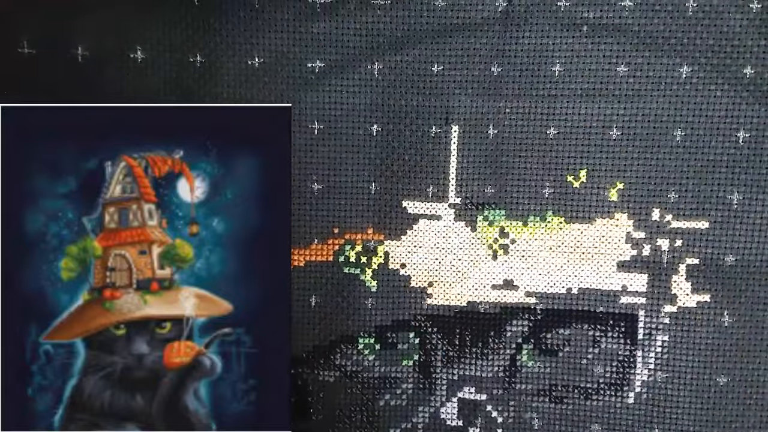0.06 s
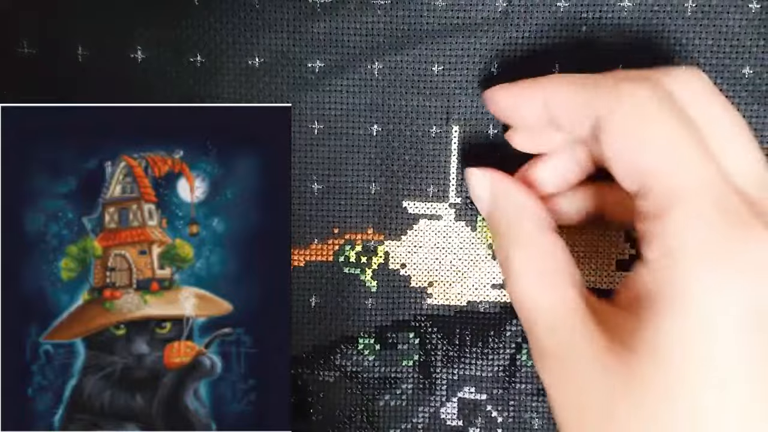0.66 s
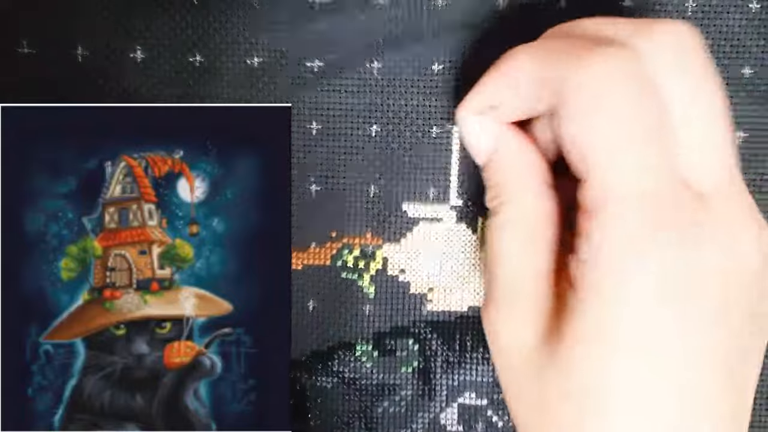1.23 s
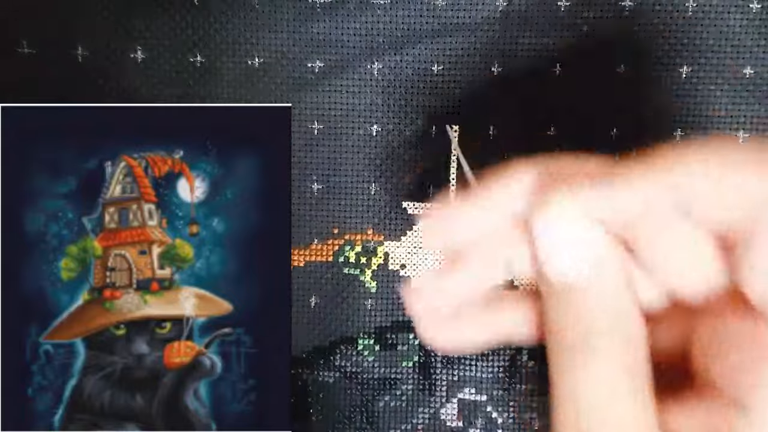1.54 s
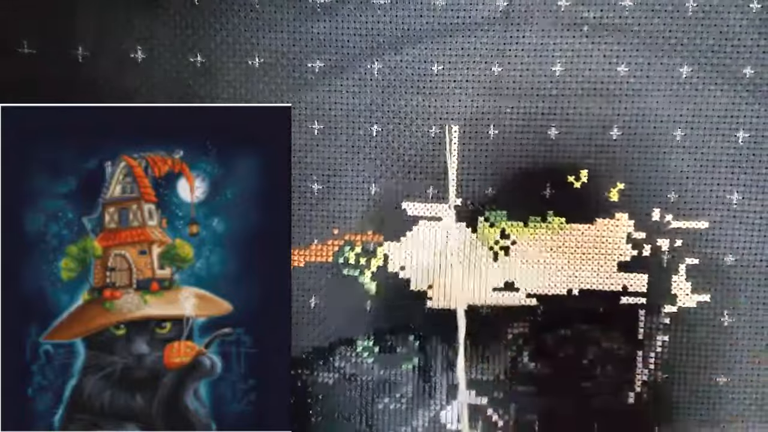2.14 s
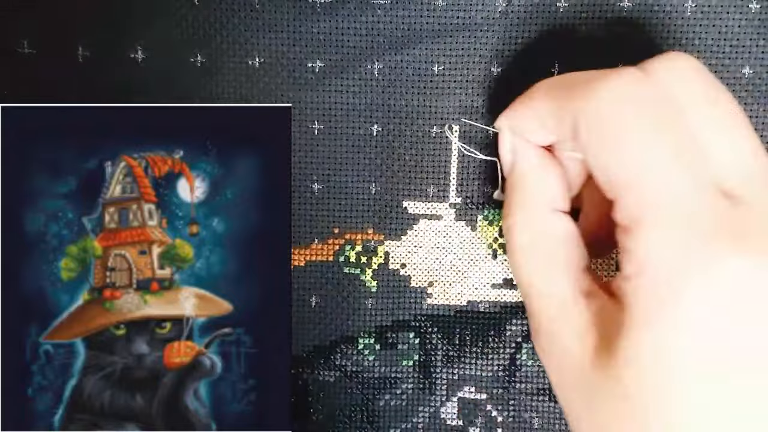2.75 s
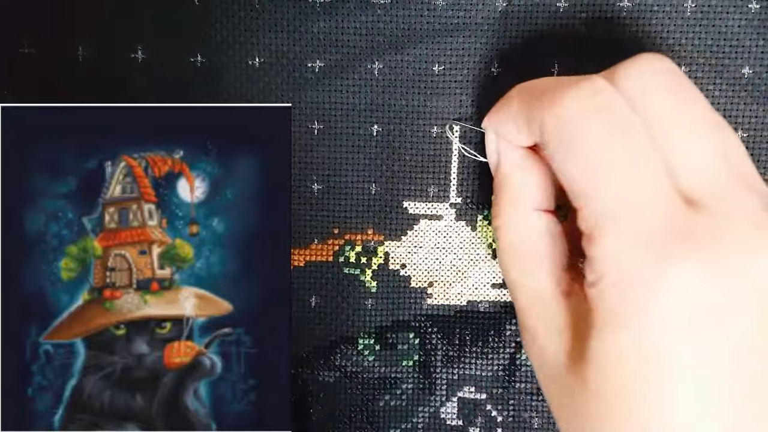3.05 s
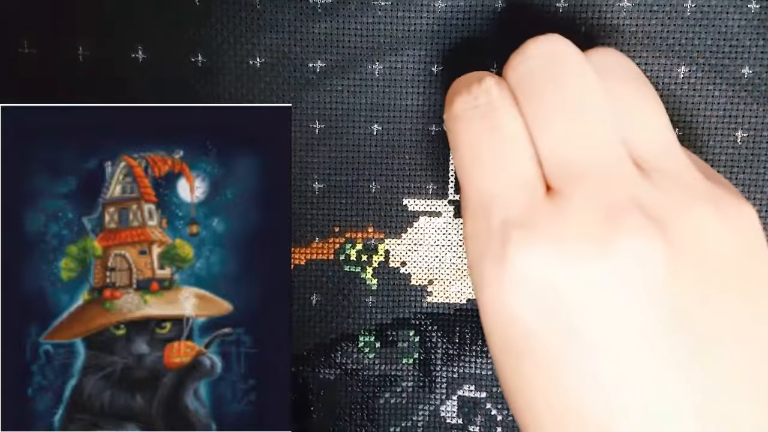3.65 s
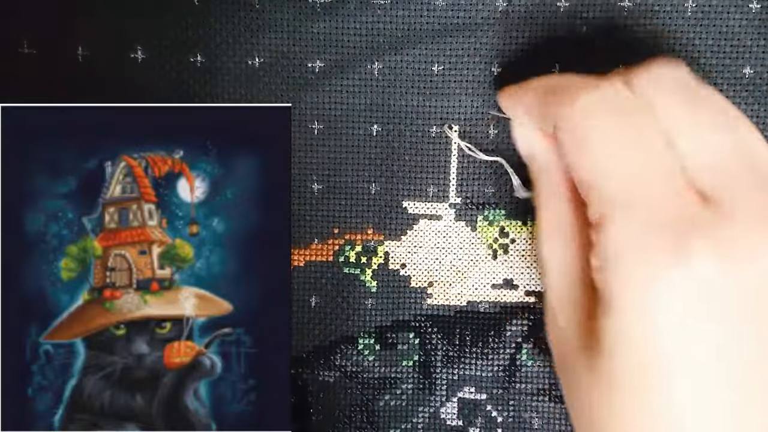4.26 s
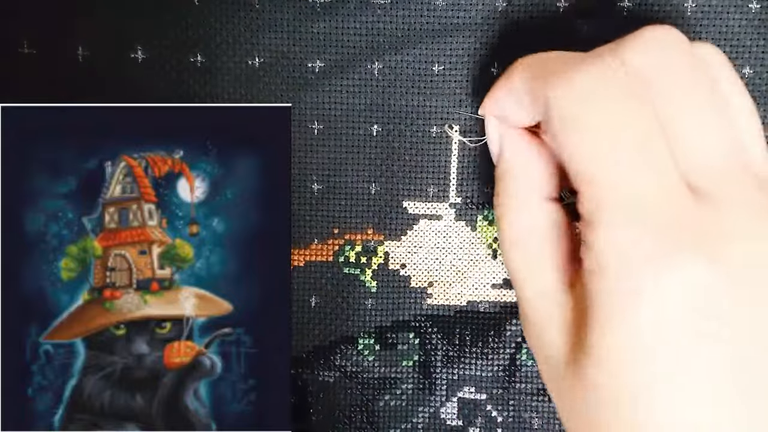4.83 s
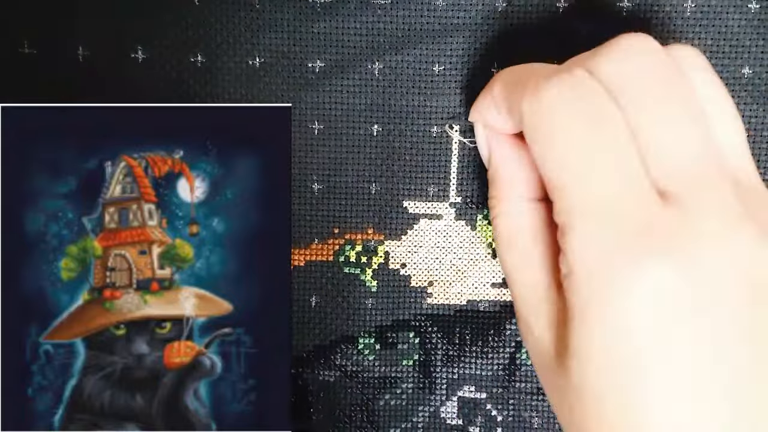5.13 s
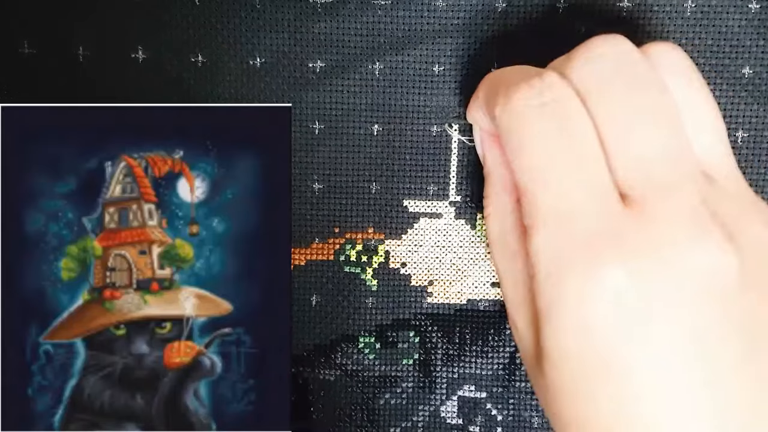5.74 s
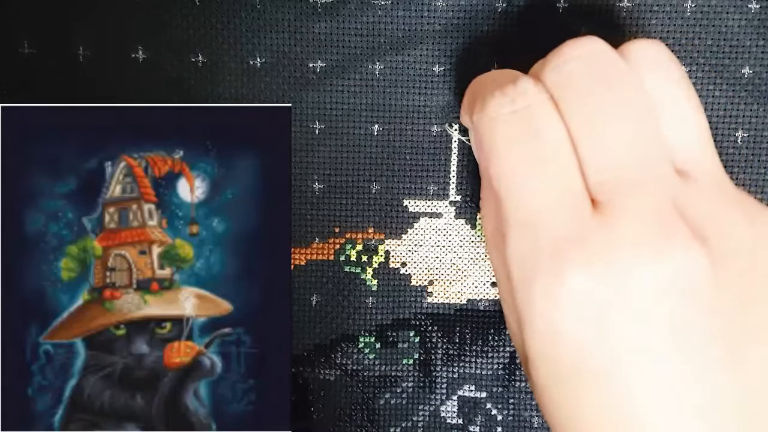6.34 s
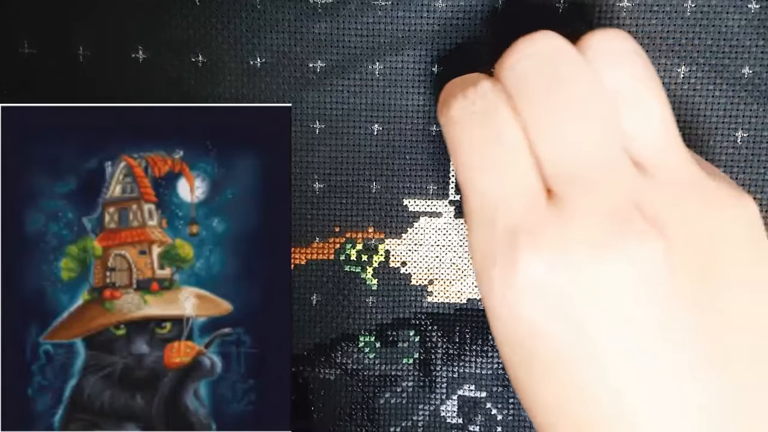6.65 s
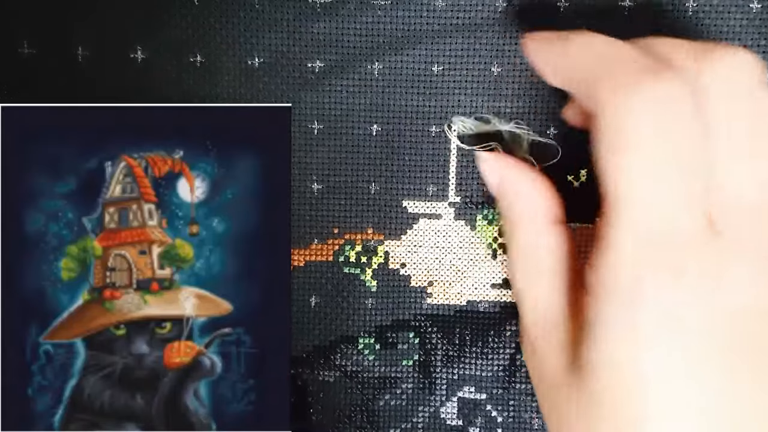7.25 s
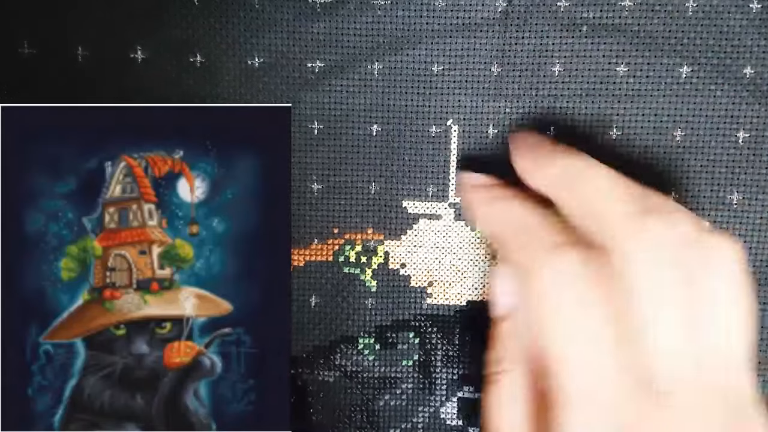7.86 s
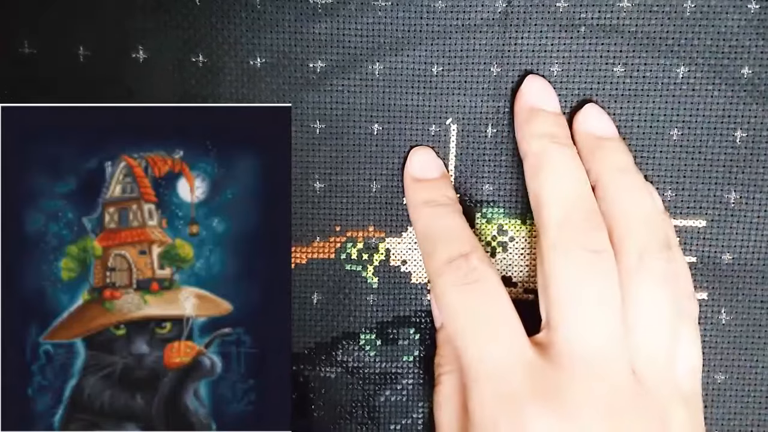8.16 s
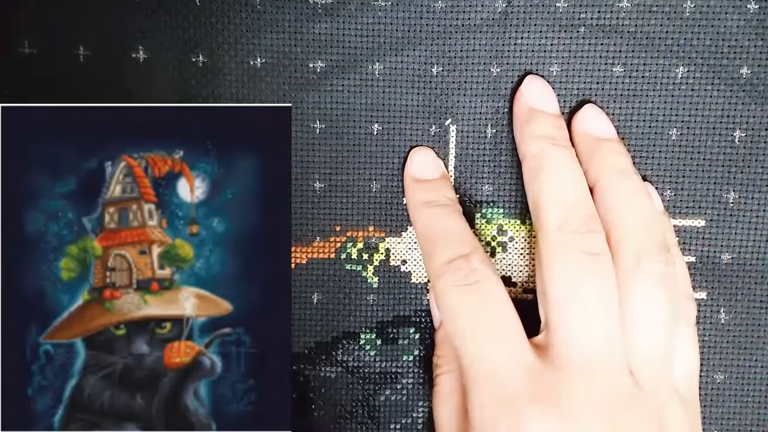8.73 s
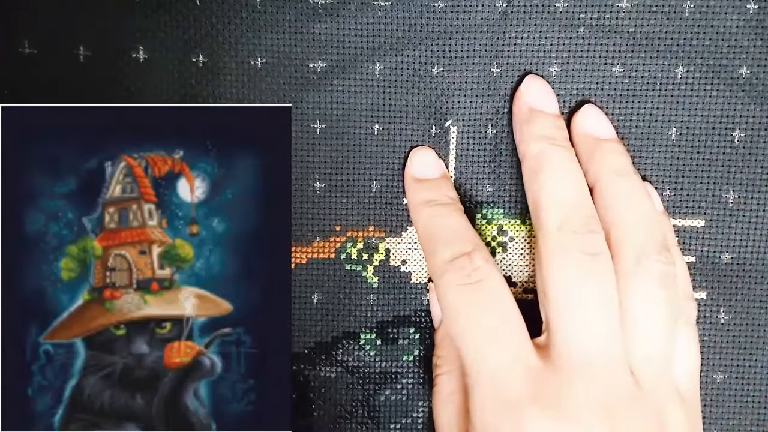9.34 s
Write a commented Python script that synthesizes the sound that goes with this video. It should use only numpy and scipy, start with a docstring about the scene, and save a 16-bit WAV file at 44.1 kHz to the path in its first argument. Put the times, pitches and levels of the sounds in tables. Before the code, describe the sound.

Close, slightly to the right, a needle pierces taut cloth with soft pops like a small slack drum. Thread slides through the weave with a faint rasp. Isolated bright ticks sound as the tip touches fabric and hoop, then the cloth pops again and several quick knocks finish the sequence. Quiet indoor room tone and microphone hiss fill the gaps.

```python
"""Small needle ticks, soft drum-like pops of cloth and rasping thread: cross-stitching in a quiet room.
The needle pops through fabric stretched in a hoop, which sounds like a small slack drum, and the thread
rasps through the weave after it. In between, the tip ticks on weave and hoop as it seeks the next hole.
The work sits close to a stereo pair of microphones, slightly right, over room tone and microphone hiss."""
import sys
import numpy as np
from scipy import signal
from scipy.fft import rfft, irfft, next_fast_len
from scipy.io import wavfile

SR = 44100
rng = np.random.default_rng(int(sys.argv[2]) if len(sys.argv) > 2 else 0)


def unload_wav(signal):
    """Save mono or channel-first audio to the path in sys.argv[1] as 16-bit WAV at rate SR, clipped to [-1, 1]."""
    wavfile.write(
        sys.argv[1],
        SR,
        np.round(np.clip(np.atleast_2d(signal).T, -1, 1) * 32767).astype(np.int16),
    )


N = 422919
T = np.arange(N) / SR
AGE = np.arange(SR // 3) / SR   # seconds since a contact


def from_db(db):
    """Decibels to gain."""
    return 10 ** (np.asarray(db) / 20)


def rms_one(x):
    """Scale to unit power."""
    return x / np.sqrt(np.mean(x ** 2) + 1e-20)


def at_hz(points, hz):
    """Read a spectrum on a log-frequency axis."""
    known_hz, values = np.transpose(points)
    return np.interp(np.log(hz + 1e-3), np.log(known_hz), values)


def band(x, hz, kind, order):
    """Causal Butterworth filter."""
    return signal.sosfilt(signal.butter(order, np.clip(hz, 10, .45 * SR), kind, fs=SR, output="sos"), x)


def dying(t60):
    """Envelope that loses 60 dB in t60 seconds."""
    return np.exp(-np.log(1000) * AGE / t60)


def add(track, start_s, sound):
    """Mix a sound in at start_s."""
    at = max(round(start_s * SR), 0)
    track[..., at:at + sound.shape[-1]] += sound[..., :N - at]


def resonate(click, modes, spread_db=1.2):
    """Resonances in parallel; no two touches weight them alike."""
    out = 0
    for hz, db, t60 in modes:
        r = np.exp(-np.log(1000) / (t60 * SR))
        gain = from_db(db - spread_db * rng.standard_normal()) * (1 - r * r) / 2
        feedback = [1, -2 * r * np.cos(2 * np.pi * hz / SR), r * r]
        out = out + gain * signal.lfilter([1, 0, -1], feedback, click + 1e-18)
    return out


def stereo_noise(spectrum):
    """Coloured noise, alike at both microphones in the bass and diffuse in the treble."""
    # stereo width: frequency_hz, side_minus_mid_db
    width = [(60, -13), (110, -5.5), (200, -2), (380, -1.5), (700, -0.5), (1290, 0.5), (2380, 0.5),
             (4400, 0), (8120, 0), (15000, 0.5)]
    size = next_fast_len(N)
    hz = np.arange(size // 2 + 1) * SR / size
    mid, side = rfft(rng.standard_normal((2, size))) * from_db(at_hz(spectrum, hz))
    mid = irfft(mid, size)[:N]
    side = irfft(side * from_db(at_hz(width, hz)), size)[:N]
    return np.array([mid + side, mid - side]) / mid.std()


def room_tone(level_db=-61):
    """The steady low rumble of the room, a touch louder on the right."""
    # room tone spectrum: frequency_hz, density_db
    spectrum = [(21, -25), (37, -8.5), (62, 2), (91, -6.5), (125, -2.5), (146, -16), (166, -4.5),
                (199, -10.5), (312, -7), (456, -11.5), (532, -12.5), (638, -14.5), (1000, -20.5),
                (1300, -52), (2200, -120)]
    return from_db(level_db) * stereo_noise(spectrum) * from_db([[-.6], [.6]])


def microphone_hiss(level_db=-66.5):
    """The microphones' own steady noise."""
    # hiss spectrum: frequency_hz, density_db
    spectrum = [(590, -11.5), (1000, 0.5), (1490, -3.5), (1670, -1), (1850, -1), (2500, -6.5), (2860, -6),
                (3100, -7.5), (3730, -7.5), (4480, -10.5), (7400, -19), (9740, -19), (14100, -12.5),
                (15400, -15)]
    return from_db(level_db) * stereo_noise(spectrum) * from_db([[-.2], [.2]])


def room_tail(dry, bass_db=-22, treble_db=-11, bass_t60=0.094, treble_t60=0.086, split_hz=900):
    """Faint, short reflections of a small furnished room: mono in the bass, diffuse above."""
    tail = 0
    for kind, db, t60, channels in (("low", bass_db, bass_t60, 1), ("high", treble_db, treble_t60, 2)):
        echoes = rng.standard_normal((channels, len(AGE))) * dying(t60) * (AGE > .002)
        tail = tail + from_db(db) * band(echoes / np.linalg.norm(echoes[0]), split_hz, kind, order=2)
    return signal.fftconvolve(dry, tail, axes=1)[:, :N]


def from_the_right(sound, delay_samples, pan_db):
    """The left microphone hears the sound a little later and weaker."""
    left, right = sound
    late_left = np.pad(left, (delay_samples, 0))[:N]
    return np.array([late_left * from_db(-pan_db / 2), right * from_db(pan_db / 2)])


def cloth_ring(release_s, ring_factor=1, pitch_factor=1, slackening=0.78, edge_hz=2470):
    """The cloth springs back, all modes at once; a slow release rounds the edge and favours low ones."""
    # modes of the stretched cloth: pitch_hz, level_db, t60_s
    cloth_modes = [(43, -25, 0.12), (67.6, -35, 0.16), (92, -14.5, 0.064), (106.5, -19.5, 0.14),
                   (127.5, -15, 0.21), (197.3, -10.5, 0.048), (255, -16, 0.12), (400, -7, 0.042),
                   (552, -16, 0.068), (815, -21, 0.018), (1090, -6.5, 0.013), (1400, -5, 0.011),
                   (2110, -6.5, 0.0084)]
    tilt_db_per_octave = 1050 * (0.0014 - release_s)   # no tilt at a release of 1.4 ms
    ring = 0
    for hz, db, t60 in cloth_modes:
        gain = from_db(db + tilt_db_per_octave * np.log2(hz / 250))
        ring = ring + gain * dying(t60 * ring_factor) * np.cos(2 * np.pi * hz * pitch_factor * AGE)
    # the force eases while the release lasts
    push = np.clip((release_s - AGE) * SR, 0, 1) * np.exp(-slackening * AGE / release_s)
    drum = signal.fftconvolve(ring, push / push.sum())[:len(AGE)]
    return band(drum, edge_hz, "low", order=2)


def stroke(start_s, length_s, attack_s=0.015, sag_db_per_s=17.5, release_t60=0.53):
    """Friction during one stroke: it grips, eases off and lets go."""
    age = np.maximum(T - start_s, 0)
    release = np.exp(-np.log(1000) * np.maximum(age - length_s, 0) / release_t60)
    return np.minimum(age / attack_s, 1) * from_db(-sag_db_per_s * age) * release


def weave_friction(slips_per_s=600, spread_db=3.5, spit_share=.6, rasp_db=1, rasp_octaves=0.062):
    """Thread or fingers slide on the weave: each fibre's slip nudges the cloth and spits a tiny hiss."""
    # hiss of rubbing fibres: frequency_hz, density_db
    fibre_spectrum = [(600, 22), (1800, 10), (3000, 9.5), (5000, 0.5), (7100, 1), (8000, -6), (9150, 2.5),
                      (9900, -1), (11600, 0.5), (12700, 1), (15000, -4)]
    # a hand under the hoop, thread pulled through or drawn aside, fingers settling on the cloth:
    # start_s, length_s, rumble_db, hiss_db, rasp_hz
    strokes = [(0, 0.041, -59.5, -62, 7000), (0.2, 0.32, -73, -65.5, 13000),
               (1.152, 0.036, -51.5, -66, 11000), (1.268, 0.45, -54.5, -62, 11000),
               (1.396, 0.34, -61, -70.5, 10800), (4.03, 0.16, -62, -68.5, 9300),
               (4.222, .16, -63, -68.5, 9500), (4.304, 0.035, -59, -77, 9000),
               (4.545, 0.065, -73, -65.5, 10200), (6.976, 0.081, -46.5, -63.5, 10000),
               (7.018, 0.035, -58, -61, 9600), (7.19, 0.028, -58, -62, 9200), (7.233, 0.14, -61, -63, 9150),
               (7.288, 0.14, -51, -66, 7000), (7.946, 0.21, -66, -88, 9000),
               (8.499, 0.15, -57.5, -82, 9000)]
    slipping = rng.random(N) < slips_per_s / SR
    slips = slipping * from_db(spread_db * np.minimum(rng.exponential(1, N), 4))
    nudges = slips * rng.choice([-1, 1], N)
    rumble = rms_one(signal.fftconvolve(nudges, cloth_ring(release_s=0.00202, ring_factor=0.85))[:N])
    spits = rms_one(signal.fftconvolve(np.sqrt(slips), dying(t60=.01))[:N])
    hiss = rms_one(stereo_noise(fibre_spectrum) * (1 - spit_share + spit_share * spits))
    rumble_gain = rasping = 0
    for start_s, length_s, rumble_db, hiss_db, rasp_hz in strokes:
        friction = stroke(start_s, length_s)
        rumble_gain = np.maximum(rumble_gain, from_db(rumble_db) * friction)
        rasp = band(hiss, [rasp_hz / 2 ** rasp_octaves, rasp_hz * 2 ** rasp_octaves], "band", order=1)
        rasping = rasping + from_db(hiss_db) * friction * rms_one(hiss + from_db(rasp_db) * rasp)
    return rasping + rumble_gain * rumble


def crack(scatter_db, scatter_t60):
    """A unit-energy click with brief scatter from nearby surfaces, different at each microphone."""
    scatter = rng.standard_normal((2, len(AGE))) * dying(scatter_t60)
    click = from_db(scatter_db) * scatter / np.linalg.norm(scatter, axis=1, keepdims=True)
    click[:, 0] += 1
    return click / np.linalg.norm(click, axis=1, keepdims=True)


def needle_taps(colour_db=-1):
    """Steel on weave and hoop: a dull knock, a bright snap and a little drum; hoop ring returned apart."""
    # hard touches of the needle: start_s, knock_db, snap_db, snap_low_hz, snap_high_hz, colour_factor,
    # hoop_db, favoured_hz, loss_db_per_octave, hoop_factor, drum_db, direction (+1 or -1)
    touches = [(.0700, -46, -43, 3500, 13000, 1, -9, 1780, 29, 1, -64, 1),
               (0.0907, -47, -36, 3500, 12000, .8, -3, 1780, 35, 1.12, -63, 1),
               (1.2463, -18, -41, 3500, 15000, 1.28, -16, 1500, 0.5, 1, -54, -1),
               (1.2546, -40, -37, 9500, 15000, 1.22, -30, 9000, 10, 1, -60, -1),
               (1.6835, -17, -33.5, 5500, 14000, 1.25, 0, 2450, 30, .92, -60, -1),
               (3.8113, -20, -23, 7500, 12000, 1.29, 3, 2100, 14, 0.93, -41, 1),
               (4.054, -28, -41, 3500, 13500, 1, -31, 2800, 11, 1, -62, -1),
               (4.097, -27, -38, 3500, 13500, 1, -25, 2800, 6, 1, -46.5, -1),
               (6.2220, -14.5, -15.5, 2800, 13400, 1, -5.5, 2300, 6.5, 0.96, -36.5, 1),
               (7.0159, -27, -34, 6500, 15000, 1.27, -5.5, 2100, 19, 1, -52, 1),
               (7.4590, -20, -36, 7000, 14000, 1.27, -20, 2100, 10, 0.86, -58, 1),
               (8.3930, -15, -37, 2600, 12500, 1.05, -21, 950, 12, 0.68, -36.5, -1),
               (8.3947, -29, -33, 2500, 7000, 1.08, -8, 3500, 16, 1.03, -51, 1),
               (8.516, -14, -40, 6000, 13500, 1.3, -16, 1300, 7, 0.79, -38.5, -1),
               (8.585, -9.5, -25.5, 5500, 13200, 1.3, -3, 1000, 3, 1, -37, -1),
               (8.681, -22.5, -53, 3500, 13800, 1, -10, 1500, 21, 1.3, -41.5, -1)]
    # broad treble resonances that colour each tick: pitch_hz, level_db, t60_s
    treble_peaks = [(3800, 11, 0.0079), (5640, 5, 0.0084), (6900, -2, .005), (9150, 4.5, 0.0036),
                    (11750, -10, .004), (14000, -1, .004)]
    # modes of the hoop, damped by the cloth: pitch_hz, level_db, t60_s
    hoop_modes = [(1043, -3, 0.023), (1300, -5, 0.046), (1580, -3, 0.038), (1815, -7.5, 0.034),
                  (1990, -27, 0.049), (2356, -4.5, 0.041), (2940, -9.5, 0.022), (3800, -4, 0.028),
                  (4010, -9, 0.056)]
    drum = cloth_ring(release_s=0.00059, ring_factor=0.8, pitch_factor=1.006)
    contact, hoop = np.zeros((2, 2, N))
    for (start_s, knock_db, snap_db, snap_low_hz, snap_high_hz, colour_factor,
         hoop_db, favoured_hz, loss_db_per_octave, hoop_factor, drum_db, direction) in touches:
        knock = crack(scatter_db=-3.5, scatter_t60=0.024)
        knock = band(band(knock, 370, "high", order=1), 2460, "low", order=2)
        snap = crack(scatter_db=-1, scatter_t60=0.022)
        snap = band(band(snap, snap_low_hz, "high", order=2), snap_high_hz, "low", order=3)
        # the treble colour shifts in pitch from tick to tick
        colour = [(hz * colour_factor, db, t60) for hz, db, t60 in treble_peaks]
        snap = snap + from_db(colour_db) * resonate(snap, colour)
        tap = from_db(knock_db) * knock + from_db(snap_db) * snap + from_db(drum_db) * drum
        add(contact, start_s, direction * tap)
        # the touched spot favours the hoop's modes near one frequency
        tuned = [(hz * hoop_factor, db, t60) for hz, db, t60 in hoop_modes]
        favoured = [(hz, db - loss_db_per_octave * abs(np.log2(hz / favoured_hz)), t60)
                    for hz, db, t60 in tuned]
        ring = resonate(crack(scatter_db=-7, scatter_t60=0.0026), favoured)
        add(hoop, start_s, direction * from_db(hoop_db) * ring)
    return contact, hoop


def cloth_pops():
    """The needle's eye or the doubled thread clears the hole, up or down, and the cloth springs back."""
    # releases of the cloth: start_s, level_db, release_s, direction (+1 or -1),
    # ring_factor (fingers on the cloth shorten the ring), pitch_factor (tension raises it)
    releases = [(0.681, -38, .0016, 1, 1.2, 0.98), (1.194, -25, 0.0027, 1, 0.99, 1.02),
                (1.2466, -10, 0.00161, -1, 0.74, 0.93), (1.283, -38, 0.0057, 1, 0.82, 0.92),
                (1.302, -36, 0.0035, -1, 1.1, 1), (1.333, -30.5, 0.00445, -1, 0.99, 1.1),
                (1.618, -38, .003, 1, 0.9, 1.2), (1.665, -34, .003, 1, .8, 1),
                (1.6836, -17.5, 0.0014, -1, 0.63, 0.96), (1.721, -31.5, 0.0093, 1, 1.7, 1.07),
                (4.054, -40.5, 0.0012, 1, .8, 0.9), (7.016, -14.5, 0.0008, 1, 0.85, 0.98),
                (7.236, -47, .004, 1, 0.97, 1.2), (7.301, -34.5, 0.0024, 1, 1.2, 0.94),
                (7.346, -36, 0.0036, 1, .9, 0.91), (7.4586, -27.5, 0.0017, 1, 0.92, 0.92),
                (7.969, -38, 0.0049, 1, 0.69, 0.93), (8.044, -40.5, 0.0083, -1, .9, 1.17),
                (8.918, -45.5, 0.0007, 1, 2.2, 0.97)]
    out = np.zeros(N)
    for start_s, level_db, release_s, direction, ring_factor, pitch_factor in releases:
        pop = cloth_ring(release_s, ring_factor, pitch_factor)
        add(out, start_s, direction * from_db(level_db) * pop)
    return out


def scene():
    """The stitching, close and slightly right, with the hoop's ring, over room tone and hiss."""
    contact, hoop = needle_taps()
    stitching = cloth_pops() + contact + weave_friction()
    work = from_the_right(stitching, delay_samples=4, pan_db=1.2) + hoop
    return room_tone() + microphone_hiss() + room_tail(work) + work


def record(dry, cutoff_hz=15450):
    """The top treble is cut steeply."""
    return signal.sosfilt(signal.ellip(10, .1, 70, cutoff_hz, fs=SR, output="sos"), dry)


dry = scene()
out = record(dry)
unload_wav(out)
```